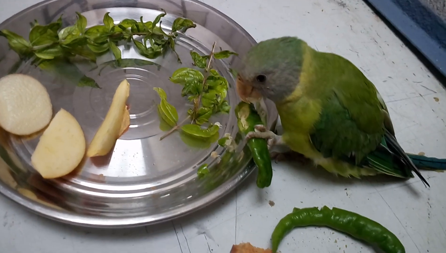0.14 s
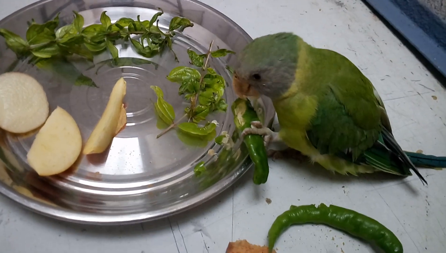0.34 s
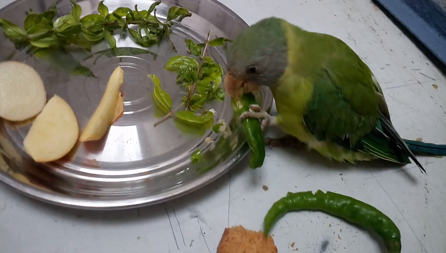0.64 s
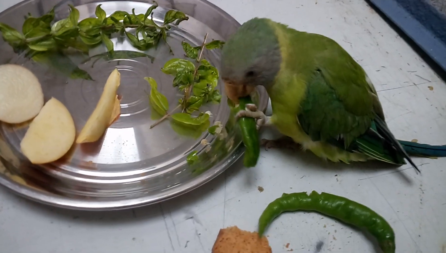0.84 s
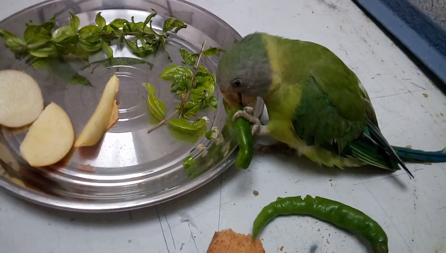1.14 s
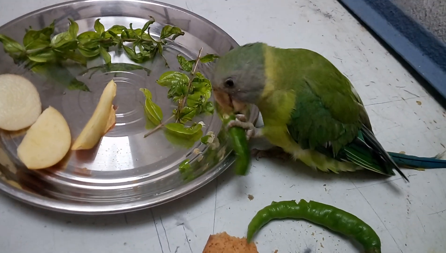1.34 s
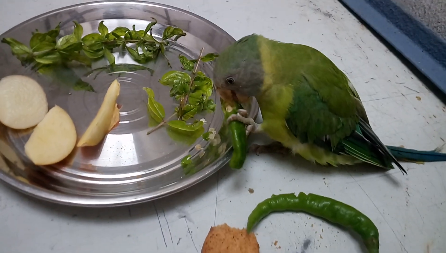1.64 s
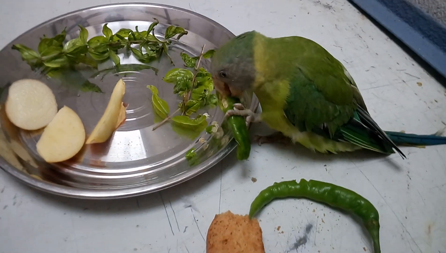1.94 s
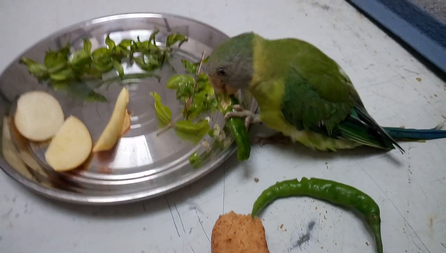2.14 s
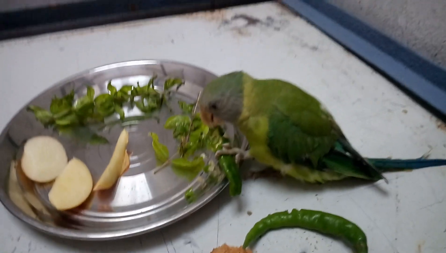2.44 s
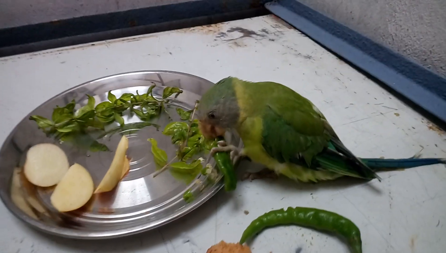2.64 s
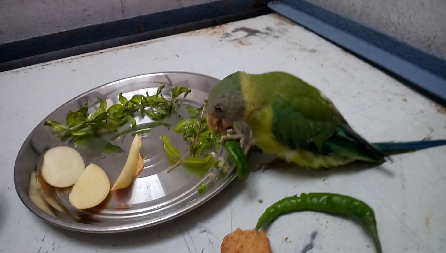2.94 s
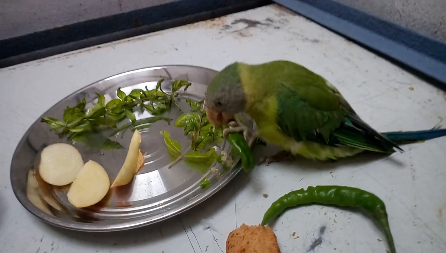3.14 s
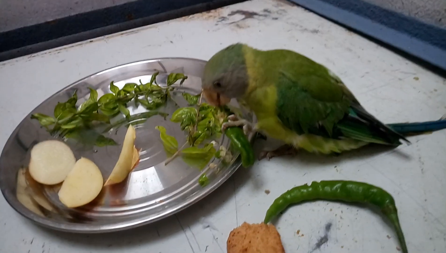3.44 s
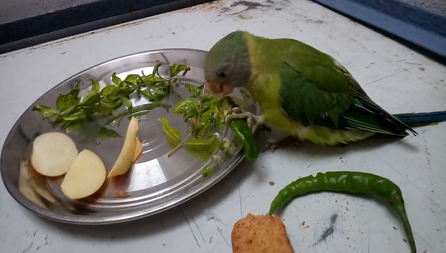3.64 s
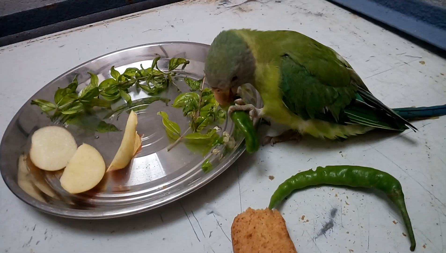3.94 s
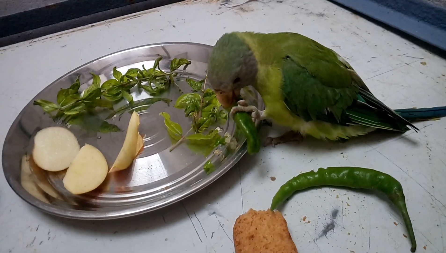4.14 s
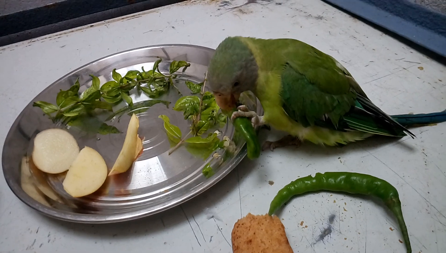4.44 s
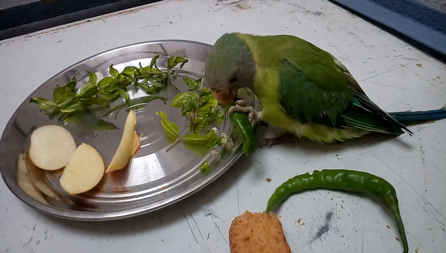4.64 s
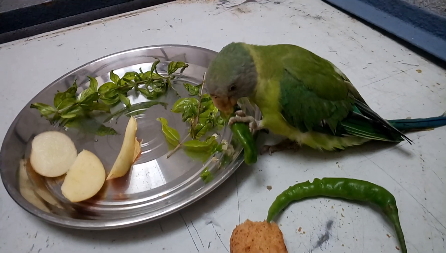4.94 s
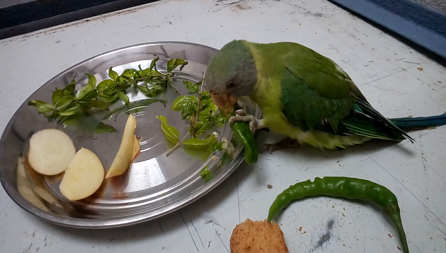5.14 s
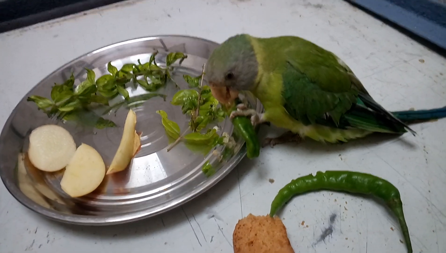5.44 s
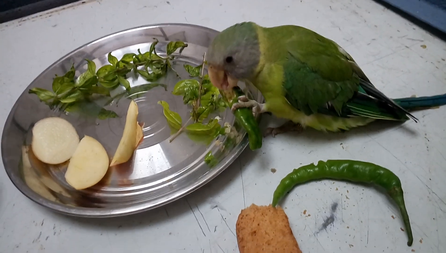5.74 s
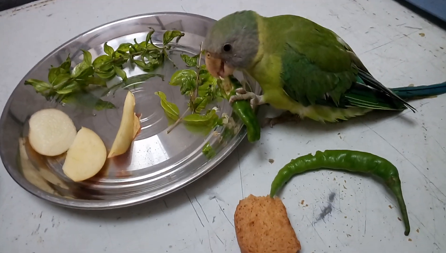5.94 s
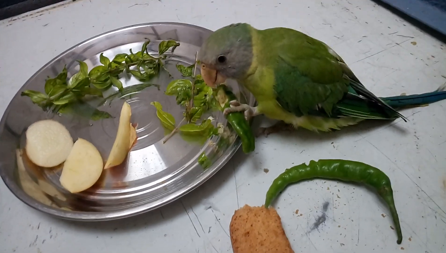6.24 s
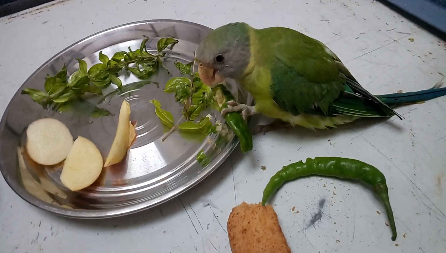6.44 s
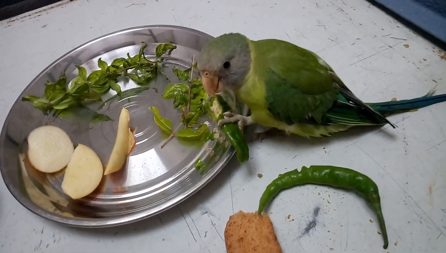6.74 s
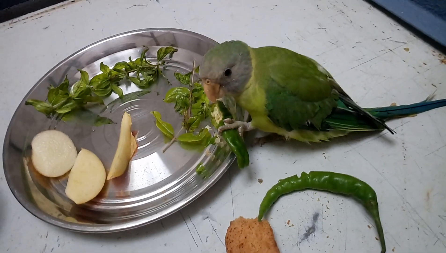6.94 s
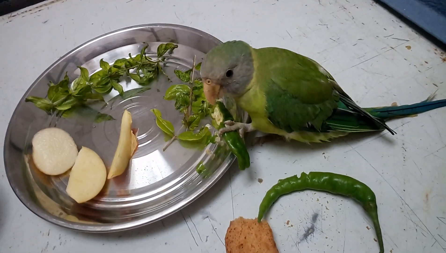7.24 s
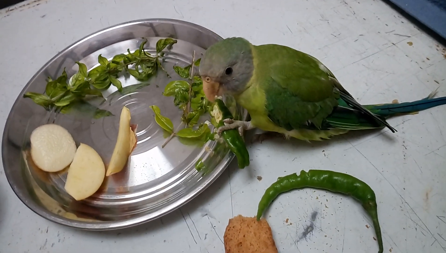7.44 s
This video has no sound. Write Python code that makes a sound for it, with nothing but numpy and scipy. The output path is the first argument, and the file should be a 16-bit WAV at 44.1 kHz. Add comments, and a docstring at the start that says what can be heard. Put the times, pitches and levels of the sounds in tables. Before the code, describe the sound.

Faint low rumble, soft hiss and a barely audible high whine lie under thin, pulsing insect trills around 5.5 kHz. At about 0.5 s a parakeet gives a loud trembling chirp in two joined steps, sliding from roughly 3.4 to 2.4 kHz. From 1.1 to 1.9 s it nibbles a crisp chilli: fine crackle, small snaps and sharp beak ticks, with two more ticks near 2.1 s. A second falling chirp comes at 2.4 s, its second step louder. Very soft peeps follow at 3.5 to 3.9 s. The strongest crunch, crisp then wet, bursts at 4.35 to 4.6 s; ticks cluster at 4.9 and 5.2 to 5.4 s. Quiet airy peeps run from 5.5 to 6.2 s, with a faint dull knock near 5.8. From 6.55 s to the end, harsh rattling squawks come in quick syllables, strongest near 7.3 s. Hard walls give a short echo; bright sounds sit left.

```python
"""A parakeet nibbles and calls: loud two-step chirps slide down, soft peeps follow, harsh squawks come last.
Its calls are trembling tones and a rattling voice in throat resonances; its beak ticks are short high tones.
The chilli it bites is a crackle of filtered grains and cracks, joined by faint narrow bursts of noise.
Insects trill in runs of fluttering pulses over a noise chorus. Calls, feeding sounds and insects echo in a
hard-walled corner; rumble, hiss, a faint whine and low knocks are dry. Bright sounds lie to the left."""
import sys
import numpy as np
from scipy import signal
from scipy.fft import rfft, irfft, next_fast_len
from scipy.io import wavfile
from scipy.ndimage import uniform_filter1d

SR = 44100
rng = np.random.default_rng(int(sys.argv[2]) if len(sys.argv) > 2 else 0)


def waveform_to_disk(signal):
    """Save audio, clipped to [-1, 1], as 16-bit WAV at the path in sys.argv[1]."""
    frames = np.transpose(np.atleast_2d(signal))
    scaled = np.clip(frames, -1, 1) * 32767
    samples = np.round(scaled).astype(np.int16)
    wavfile.write(sys.argv[1], SR, samples)


N = 335160
T = np.arange(N) / SR

# Outdoor rumble, spectral shape: pitch_hz, relative_level_db_per_hz
RUMBLE_COLOUR = [(25, -3), (50, -6.5), (75, 1), (100, 10.5), (200, 3.5), (350, -4.5), (700, -8.5),
                 (1100, -5.5), (1600, -13.5), (2300, -1), (3100, -5), (3700, -31), (5000, -37.5)]
# Hiss and tiny snaps, spectral shape: pitch_hz, relative_level_db_per_hz
HISS_COLOUR = [(3000, -13), (4200, 8), (7000, -9), (8500, -20.5), (12000, -12.5), (15000, -26.5)]
# Insect chorus, level over time: time_s, level_db
CHORUS_LEVEL = [(0.0, -57.5), (1.7, -60.5), (1.9, -61.5), (3.3, -66), (4.3, -69.5), (4.55, -49.5),
                (5.04, -72.5), (5.27, -64), (6.3, -64.5), (7.2, -56.5), (7.6, -68.5)]
# Insect chorus, spectral shape: pitch_hz, relative_level_db_per_hz
CHORUS_COLOUR = [(3600, -23), (4400, -13.5), (4900, 1.5), (5350, 2), (5800, 5.5), (6200, -13), (6800, -38),
                 (8000, -45)]
# Runs of evenly spaced insect pulses: first_pulse_s, last_pulse_s, nominal_peak_db, pitch_hz
TRILLS = [(0.174, 0.938, -52, 5516), (1.048, 1.289, -48.5, 5560), (1.471, 1.812, -40.5, 5430),
          (2.0773, 2.725, -50.5, 5660), (2.856, 3.617, -49.5, 5690), (3.714, 4.203, -54.5, 5810),
          (5.005, 6.182, -52.5, 5573), (6.416, 7.467, -56.5, 5610)]
# Dull knocks: start_s, envelope_peak_db
BUMPS = [(5.767, -53), (6.034, -72), (6.108, -69.5), (6.368, -62.5)]
# Dull knocks, spectral shape: pitch_hz, relative_level_db_per_hz
BUMP_COLOUR = [(40, -11), (90, 7.5), (250, 0), (600, -7.5), (1200, -11), (2500, -45)]
# Faint narrow bursts of noise, some alone, some within the chirp, crunch and peeps:
# start_s, envelope_peak_db, centre_hz, width_hz, decay_s
NOISE_BURSTS = [(0.01, -69, 228, 96, 0.083), (0.02, -72, 3026, 199, 0.44), (1.12, -71.5, 417, 85.4, 0.12),
                (1.439, -57.5, 1360, 670, 0.034), (1.783, -60, 1780, 673, 0.022),
                (1.868, -54.5, 7400, 800, 0.011), (1.945, -59.5, 6370, 910, 0.069),
                (2.113, -46, 3940, 1290, 0.014), (2.42, -46.5, 4680, 1110, 0.016),
                (2.458, -68.5, 1564, 220, 0.16), (2.69, -67.5, 6800, 1220, 0.049),
                (3.932, -59.5, 6800, 1114, 0.016), (4.09, -63, 1405, 200, 0.027),
                (4.495, -51, 1260, 855, 0.077), (4.813, -53.5, 4440, 500, 0.031),
                (5.099, -60, 3280, 1000, 0.025), (5.324, -68, 2290, 404, 0.18),
                (5.501, -54.5, 4220, 487, 0.078), (5.621, -49.5, 2510, 696, 0.025),
                (5.809, -65.5, 1170, 1294, 0.19), (5.86, -53.5, 4400, 616, 0.072),
                (6.221, -60, 2170, 398, 0.032), (6.33, -72, 546, 293, 0.16)]
# Bites, each a short spell of crackle: start_s, length_s, wet_flesh_db, crisp_skin_db
BITES = [(1.106, 0.12, -54, -54), (1.316, 0.14, -60.5, -54.5), (1.44, 0.028, -58, -49.5),
         (1.518, 0.15, -61.5, -63), (1.766, 0.14, -71.5, -60.5), (4.016, .28, -72, -62),
         (4.38, 0.044, -64, -47), (4.49, 0.092, -49, -45), (4.626, 0.15, -60.5, -70)]
# The loudest cracks of the chilli: start_s, skin_db, flesh_db
CRACKS = [(1.074, -39.5, -65), (1.1937, -31.5, -65), (1.3751, -39, -43), (1.5395, -57, -39),
          (1.6228, -50, -54), (4.0954, -50, -58), (4.361, -41, -55.5), (4.4033, -35, -63),
          (4.4223, -24.5, -51), (4.4416, -35, -47), (4.472, -49, -32.5), (4.4816, -52, -34.5),
          (4.4952, -27.5, -37), (4.499, -40, -28.5), (4.5249, -26.5, -25), (4.565, -28, -35.5),
          (4.5694, -30.5, -43), (4.5771, -31, -38), (4.7531, -34, -50.5)]
# Wet flesh, spectral shape: pitch_hz, relative_level_db_per_hz
FLESH_COLOUR = [(400, -47), (850, -14.5), (1500, -16), (1850, -3), (2300, 10), (3100, 7.5), (3600, -9),
                (5000, -71.5)]
# Crisp skin, spectral shape: pitch_hz, relative_level_db_per_hz
SKIN_COLOUR = [(2500, -37), (3600, -2.5), (4300, 15), (5300, 18), (6200, 10.5), (7300, -9), (8500, -28),
               (10200, -18), (12000, -37), (15000, -52)]
# Sharp beak ticks: time_s, peak_db, pitch_hz
TICKS = [(1.5408, -21, 5000), (1.8673, -21.5, 5024), (2.1277, -22.5, 4986), (2.1354, -25, 5180),
         (4.8807, -27.5, 5140), (4.8864, -27.5, 4990), (4.8952, -26.5, 4880), (4.945, -31.5, 5080),
         (5.216, -23, 5110), (5.2709, -24, 4950), (5.348, -30.5, 5060), (5.3712, -32, 4850),
         (5.67, -38.5, 5100), (6.5861, -25.5, 4320), (7.0666, -29, 4000)]
# Soft closed-beak notes: start_s, length_s, pitch_hz, level_db, octave_relative_db
PEEPS = [(3.544, 0.083, 2590, -66.5, -21), (3.668, .035, 2600, -45.5, -38), (3.831, 0.05, 2610, -54, -38),
         (5.49, 0.036, 2605, -41, -7.5), (5.79, 0.21, 3120, -60, -15), (5.896, 0.097, 2620, -53, -3.5),
         (6.157, 0.046, 2585, -49, -6)]
# Squawk syllables: start_s, length_s, pitch_hz, rise_hz, then one level_db per throat resonance, low to high
SQUAWKS = [ (6.553, 0.072, 1087, -2, -70, -67.5, -52.5, -48.5),
           (6.607, 0.0477, 1070, -22, -66, -35, -43, -45),
           (6.664, 0.056, 1054, -15.5, -64, -44.5, -70, -64.5),
           (6.755, .123, 1340, 241.5, -77, -28.5, -29, -61.5),
           (6.878, 0.0399, 1014, 39.5, -53, -41.5, -33.5, -70),
           (7.019, 0.048, 1014, 42, -87, -40.5, -44.5, -50), (7.068, .035, 1074, 1.5, -52, -60, -33, -34),
           (7.101, 0.0605, 1062, -20, -54.5, -25, -39, -41.5),
           (7.236, .14, 1307, 241.5, -64, -21.5, -27, -50.5),
           (7.392, .06, 1046, -20, -58.5, -61.5, -39.5, -81), (7.55, 0.044, 963, 10.5, -51, -34, -61, -50)]
# Throat resonances: centre_hz, width_hz, level_db
THROAT = [(1098, 570, -4.5), (2472, 573, -7.5), (2866, 638, -2.5), (4435, 760, 0.5)]
# Chirp steps, one note each: start_s, length_s, first_hz, last_hz, bend (1 straight, more drops early),
# level_db, fade_over_note_db, octave_relative_db
CHIRPS = [(0.47, 0.096, 3380, 2959, 2.2, -19.5, 3.5, -15), (0.555, 0.12, 2961, 2352, 1.8, -22, 7, -17),
          (2.406, .09, 3715, 3005, 2.5, -37.5, 1, -18), (2.499, .13, 2859, 2348, 2.1, -19, 12.5, -14.5)]
# How much louder the left side is: pitch_hz, left_over_right_db
LEFT_DB = [(100, 1), (450, 0), (1300, 3), (2400, 14.5), (3300, 17), (5000, 16), (6500, 18.5), (9000, 8.5),
           (12000, 13)]

RUMBLE_DB, HISS_DB, WHINE_DB, WHINE_HZ = -74, -74, -84.5, 11891
PULSES_PER_S = 7.7  # approximate: each run holds a whole number of gaps
BITE_ATTACK_S, BITE_RELEASE_S = 0.03, 0.018
PEEP_ATTACK_S, PEEP_RELEASE_S, PEEP_FADE_DB, PEEP_SAG_HZ_PER_S = 0.019, 0.012, 1.5, 500
# the low resonance dies away last
SQUAWK_ATTACK_S, SQUAWK_RELEASE_S = 0.032, (0.046, 0.012, 0.013, 0.0091)
CHIRP_ATTACK_S, CHIRP_RELEASE_S = 0.031, 0.019
ROOM_T60_S = 0.4
STOPBAND_EDGE_HZ = 16000
RIGHT_DELAY_SAMPLES = 8


def from_db(db):
    """Decibels to gain."""
    return 10 ** (np.asarray(db) / 20)


def rms_one(x):
    """Scale to unit power."""
    return x / np.sqrt(np.mean(x ** 2) + 1e-20)


def gain_at(points, size):
    """A spectrum table as gains on the frequency grid of a signal of this size, smooth in log pitch."""
    hz, db = np.transpose(points)
    grid_hz = np.arange(size // 2 + 1) * SR / size
    return from_db(np.interp(np.log(grid_hz + 1), np.log(hz), db))


def colour(x, points):
    """Filter by a spectrum table, keeping the power of white noise."""
    return irfft(rfft(x) * rms_one(gain_at(points, N)), N)


def noise(points):
    """Coloured noise of about unit power."""
    return colour(rng.standard_normal(N), points)


def highpass(x, hz):
    """A steep low cut."""
    return signal.sosfilt(signal.butter(8, hz, "high", fs=SR, output="sos"), x)


def band(x, hz, width_hz):
    """A steep-sided resonance."""
    edges_hz = [max(hz - width_hz / 2, 30), hz + width_hz / 2]
    return signal.sosfilt(signal.butter(4, edges_hz, "band", fs=SR, output="sos"), x + 1e-18)


def band_noise(hz, width_hz):
    """Noise of unit power in one band."""
    return rms_one(band(rng.standard_normal(N), hz, width_hz))


def drift(rate_hz):
    """Random wandering up to a rate; spread 1."""
    lowpass = signal.butter(4, rate_hz, fs=SR, output="sos")
    # the first second lets the filter settle
    return rms_one(signal.sosfilt(lowpass, rng.standard_normal(N + SR))[SR:])


def bursts(times, levels_db, decay_s):
    """An envelope that jumps at each time and dies away."""
    kicks = np.zeros(N)
    kicks[(np.asarray(times) * SR).astype(int)] = from_db(levels_db)
    return signal.lfilter([1], [1, -np.exp(-1 / (decay_s * SR))], kicks + 1e-18)


def progress(start_s, length_s):
    """Runs from zero to one during a note."""
    return np.clip((T - start_s) / max(length_s, 1e-3), 0, 1)


def envelope(start_s, length_s, attack_s, release_s):
    """A smooth attack, a hold to the end of the note, then a dying release."""
    rise = np.sin(np.pi / 2 * progress(start_s, attack_s)) ** 2
    return rise * np.exp(-np.clip((T - start_s - length_s) / release_s, 0, 20))


def background(apart=0.94):
    """Far rumble, hiss and a faint electric whine; the rumble is partly alike on the two sides."""
    shared = noise(RUMBLE_COLOUR)
    separate = np.array([noise(RUMBLE_COLOUR), noise(RUMBLE_COLOUR)])
    rumble = from_db(RUMBLE_DB) * (shared + apart * separate)
    hiss = from_db(HISS_DB) * np.array([noise(HISS_COLOUR), noise(HISS_COLOUR)])
    whine = from_db(WHINE_DB) * np.sin(2 * np.pi * WHINE_HZ * T)
    return rumble + hiss + whine


def insects(swell_s=0.014, fall_per_s=0.51, scatter=0.026, uneven_db=3.5, detune=0.01, flutter_db=4):
    """Each trill pulse swells, flutters and sags in pitch, a little unlike the last, over a shimmering chorus."""
    chorus_s, chorus_db = np.transpose(CHORUS_LEVEL)
    shimmer = from_db(4.5 * drift(24))
    out = from_db(np.interp(T, chorus_s, chorus_db)) * shimmer * noise(CHORUS_COLOUR)
    waver = scatter * drift(300)
    flutter = rms_one(from_db(flutter_db * drift(110)))
    strength = from_db(uneven_db * drift(15))
    tuning = 1 + detune * drift(9.3)
    for first_s, last_s, db, hz in TRILLS:
        count = 1 + round(abs(last_s - first_s) * PULSES_PER_S)
        times = np.linspace(first_s, min(last_s, T[-1]), count)
        for at in (times * SR).astype(int):
            span = slice(at, at + SR // 5)
            age = T[span] - T[at]
            # the fall is a fraction of the run's pitch
            pitch_hz = hz * (tuning[at] - fall_per_s * (age - swell_s) + waver[span])
            swell = np.sqrt(age / swell_s * np.exp(1 - age / swell_s))
            tone = np.sin(2 * np.pi * np.cumsum(pitch_hz) / SR)
            out[span] += from_db(db) * strength[at] * swell * flutter[span] * tone
    return out


def bumps():
    """Soft low knocks: dark noise that jumps up and dies away."""
    s, db = np.transpose(BUMPS)
    return bursts(s, db, decay_s=0.022) * noise(BUMP_COLOUR)


def noise_bursts():
    """Faint narrow bursts of noise that die away, each in a range of its own."""
    white = rng.standard_normal(N)
    out = 0
    for s, db, hz, width_hz, decay_s in NOISE_BURSTS:
        burst = band(bursts([s], [db], decay_s) * white, hz, width_hz)
        # make up the power lost outside the band
        out = out + burst * np.sqrt(SR / 2 / width_hz)
    return out


def crunch(grains_per_s=600, spread_db=1.0, clump_db=3, crack_s=0.0031, skin_snap_db=-35, beak_snap_db=-24):
    """Cells of the chilli burst in a fine, clumpy crackle, with single louder cracks."""
    crack_times, skin_db, flesh_db = np.transpose(CRACKS)
    flesh, skin = np.zeros(N), np.zeros(N)
    for s, length_s, wet_db, crisp_db in BITES:
        bite = envelope(s, length_s, BITE_ATTACK_S, BITE_RELEASE_S)
        flesh += from_db(wet_db) * bite
        skin += from_db(crisp_db) * bite
    sizes = from_db(spread_db * np.minimum(rng.exponential(1, N), 4)) * rng.choice([-1, 1], N)
    clumps = from_db(clump_db * drift(55))
    grains = rms_one(sizes * clumps * (rng.random(N) < grains_per_s / SR))
    low = flesh * grains + bursts(crack_times, flesh_db, crack_s) * rng.standard_normal(N)
    high = skin * grains + bursts(crack_times, skin_db, crack_s) * rng.standard_normal(N)
    # each crack and beak tick also starts with a tiny wide-band snap
    tick_times, tick_db, _ = np.transpose(TICKS)
    snap = bursts(crack_times, skin_db + skin_snap_db, decay_s=0.00033)
    snap = snap + bursts(tick_times, tick_db + beak_snap_db, decay_s=0.00084)
    snap = snap * rng.standard_normal(N)
    return colour(low, FLESH_COLOUR) + colour(high, SKIN_COLOUR) + colour(snap, HISS_COLOUR)


def ticks(length_s=0.0047, lead_s=0.001, scrape_db=-17, scrape_s=0.0015):
    """The beak's edges slip over each other: a short burst of a high tone with a brief scrape."""
    out = np.zeros(N)
    t = np.arange(int(length_s * SR)) / SR
    for s, db, hz in TICKS:
        at = int((s - lead_s) * SR)
        out[at:at + len(t)] += from_db(db) * np.hanning(len(t)) * np.sin(2 * np.pi * hz * t)
    times, peaks_db, _ = np.transpose(TICKS)
    scrape = bursts(times, peaks_db + scrape_db, scrape_s) * rng.standard_normal(N)
    return out + colour(scrape, SKIN_COLOUR)


def whistle(hz, loudness, octave_db, jitter, flutter, rasp_db, air_db, buzz_hz=470):
    """A syrinx note: a gliding, trembling tone; a buzz adds side tones; the beak rings with octave and air."""
    phase = 2 * np.pi * np.cumsum(hz * (1 + jitter * drift(170))) / SR
    buzz = np.sin(2 * np.pi * np.cumsum(buzz_hz * (1 + 0.54 * drift(90))) / SR)
    tone = np.sin(phase) * (1 + flutter * drift(270) + from_db(rasp_db) * buzz)
    air = from_db(air_db) * band_noise(4930, 270)
    upper = from_db(octave_db) * (np.sin(2 * phase) + air)
    beak_ring = band(loudness * upper, 4980, 530)
    return np.sqrt(2) * (loudness * tone + beak_ring)


def peeps():
    """Quiet, airy syrinx notes that sag a little in pitch and level."""
    out = 0
    for s, length_s, start_hz, db, octave_db in PEEPS:
        done = progress(s, length_s)
        hz = start_hz - PEEP_SAG_HZ_PER_S * length_s * done
        loudness = from_db(db - PEEP_FADE_DB * done) * envelope(s, length_s, PEEP_ATTACK_S, PEEP_RELEASE_S)
        out = out + whistle(hz, loudness, octave_db, jitter=0.0091, flutter=0.17, rasp_db=-24, air_db=7.5)
    return out


def syllables():
    """The pitch of the squawking voice and the effort that drives each throat resonance."""
    pitch_hz, efforts = SQUAWKS[0][2], np.zeros((len(THROAT), N))
    for s, length_s, hz, rise_hz, *levels_db in SQUAWKS:
        pitch_hz = np.where(T >= s, hz + rise_hz * progress(s, length_s), pitch_hz)
        for k, (db, release_s) in enumerate(zip(levels_db, SQUAWK_RELEASE_S)):
            efforts[k] += from_db(db) * envelope(s, length_s, SQUAWK_ATTACK_S, release_s)
    return pitch_hz, efforts


def squawks(rattle_hz=92, unevenness=0.24, jitter=0.01118, bend=0.0569, air_db=-9, edge_db=-19):
    """A shrill voice chopped by an uneven rattle: each puff bends the pitch and rings the throat."""
    pitch_hz, efforts = syllables()
    cycle = np.cumsum(rattle_hz * (1 + unevenness * drift(39.41))) / SR % 1
    puffs = 0.35 + np.exp(-3.5 * cycle)
    hz = pitch_hz * (1 + jitter * drift(294) + bend * np.cos(2 * np.pi * cycle))
    phase = 2 * np.pi * np.cumsum(hz) / SR
    voice = rms_one(sum(np.cos(k * phase) for k in range(1, 7)))
    source = puffs * (voice + from_db(air_db) * band_noise(4010, 3570))
    out = 0
    for effort, (centre_hz, width_hz, db) in zip(efforts, THROAT):
        ringing = band(source, centre_hz, width_hz)
        # even out the slow level so that the effort alone sets it
        slow_level = np.sqrt(uniform_filter1d(ringing ** 2, SR // 40) + 1e-9)
        out = out + effort * from_db(db) * ringing / slow_level
    # effort in the upper two resonances adds a bright edge
    edge_effort = efforts[-1] + 0.12 * efforts[-2]
    return out + from_db(edge_db) * edge_effort * rms_one(band(source, 5800, 2000))


def chirps():
    """Loud open-beak notes fall and level off with a trace of rushing air; the throat passes little below."""
    notes = 0
    for s, length_s, first_hz, last_hz, bend, db, fade_db, octave_db in CHIRPS:
        done = progress(s, length_s)
        hz = last_hz + (first_hz - last_hz) * (1 - done) ** bend
        loudness = from_db(db - fade_db * done) * envelope(s, length_s, CHIRP_ATTACK_S, CHIRP_RELEASE_S)
        notes = notes + whistle(hz, loudness, octave_db, jitter=0.022, flutter=0.37, rasp_db=-17.5, air_db=-16)
    push = uniform_filter1d(np.abs(notes), SR // 200)
    rush = from_db(-30.5) * push * band_noise(4800, 1900)
    return highpass(notes + rush, 1950)


def room(x, early_db, tail_db, early_s=0.01):
    """Direct sound, a cluster of close reflections and a diffuse tail, different on each side."""
    t = T[:SR]
    hits = rng.standard_normal((2, SR)) * (rng.random((2, SR)) < 1500 / SR)
    early = hits * np.exp(-t / early_s) * (t > 0.002)
    tail = rng.standard_normal((2, SR)) * from_db(-60 * t / ROOM_T60_S) * (1 - np.exp(-t / 0.0065))
    # unit energy, so the two levels are relative to the direct sound
    echo = (from_db(early_db) * rms_one(early) + from_db(tail_db) * rms_one(tail)) / np.sqrt(SR)
    return x + signal.fftconvolve(x[None], echo, axes=1)[:, :N]


def microphones(x):
    """The right side is shaded in the treble and hears everything a little later."""
    size = next_fast_len(N + SR // 10)
    ratio = gain_at(LEFT_DB, size)
    late = np.exp(-2j * np.pi * np.arange(size // 2 + 1) * RIGHT_DELAY_SAMPLES / size)
    # hold the summed level of the sides steady, with a limit where they would cancel
    sides = np.array([ratio, late]) * 2 / np.abs(ratio + late).clip(1.5)
    return irfft(rfft(x, size) * sides, size)[:, :N]


def scene():
    """Insects, feeding sounds and calls echo in the corner; background and knocks are dry."""
    trill = room(insects(), early_db=-6, tail_db=-9)
    feeding = room(noise_bursts() + crunch() + ticks(), early_db=-4.0, tail_db=-8)
    whistled = room(peeps() + chirps(), early_db=-15, tail_db=-6)
    harsh = room(squawks(), early_db=-3.5, tail_db=-2.5)
    return microphones(background() + bumps() + trill + feeding + whistled + harsh)


def record(dry):
    """A steep filter cuts the top."""
    return signal.sosfilt(signal.cheby2(14, 60, STOPBAND_EDGE_HZ, fs=SR, output="sos"), dry)


dry = scene()
out = record(dry)
waveform_to_disk(out)
```